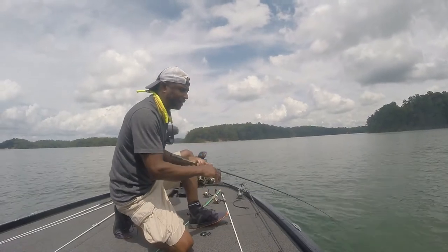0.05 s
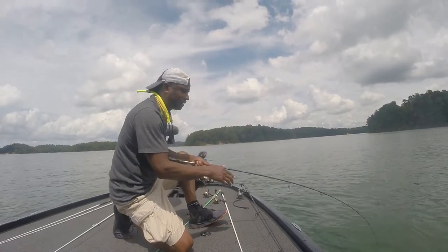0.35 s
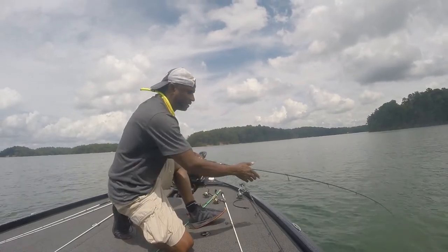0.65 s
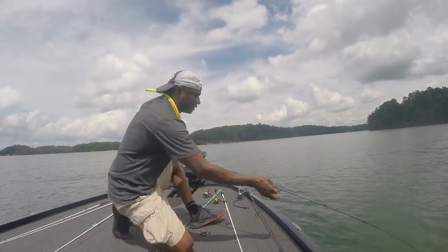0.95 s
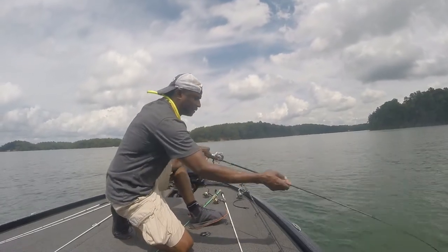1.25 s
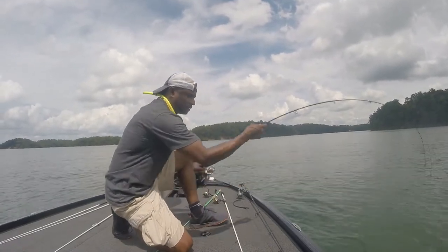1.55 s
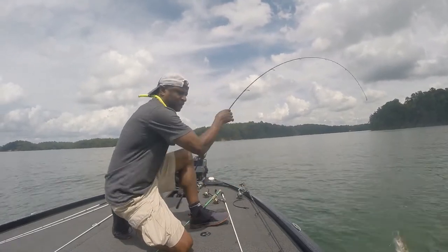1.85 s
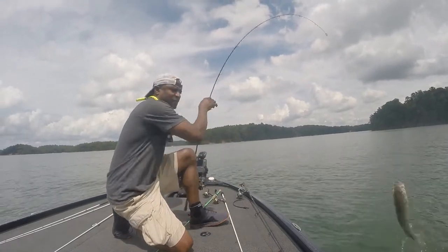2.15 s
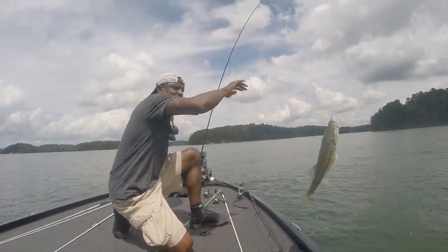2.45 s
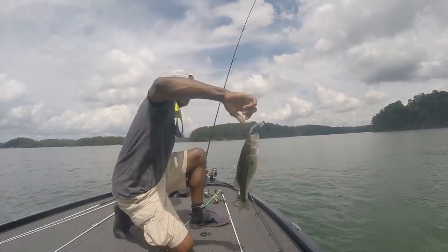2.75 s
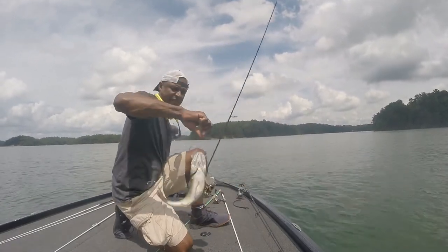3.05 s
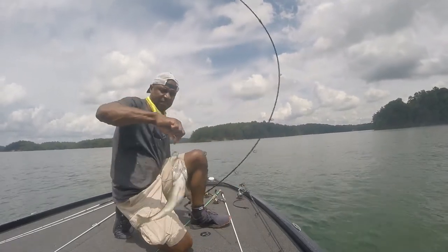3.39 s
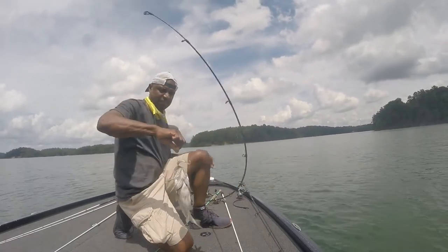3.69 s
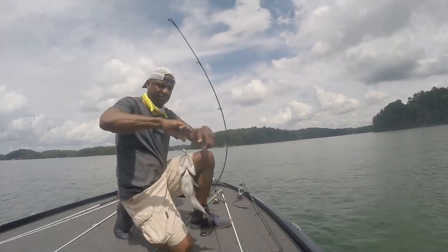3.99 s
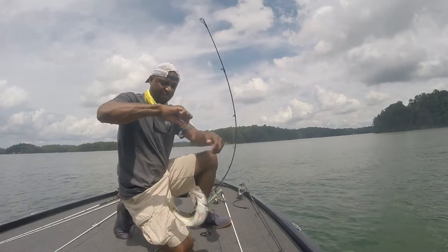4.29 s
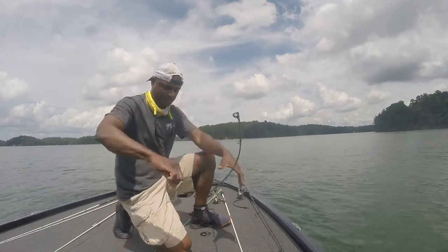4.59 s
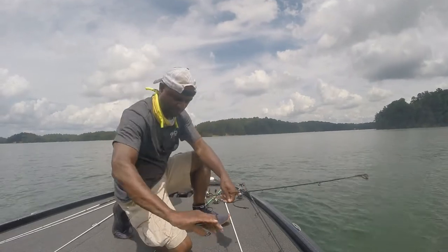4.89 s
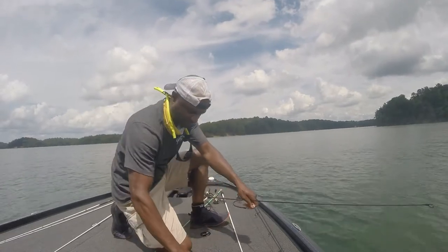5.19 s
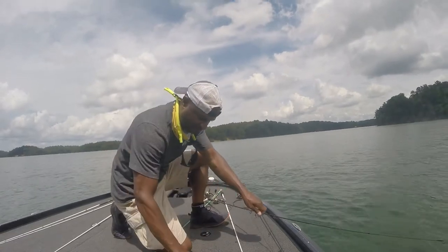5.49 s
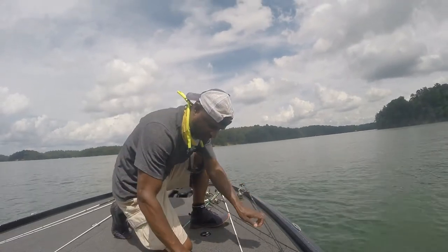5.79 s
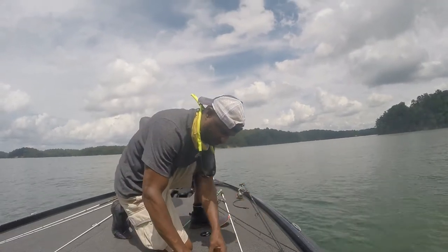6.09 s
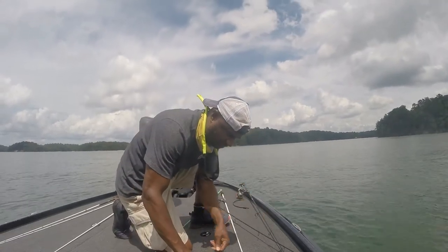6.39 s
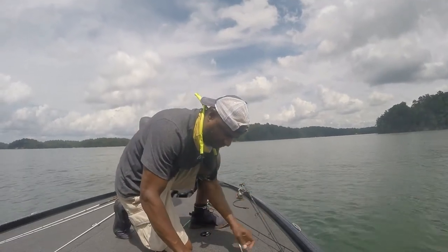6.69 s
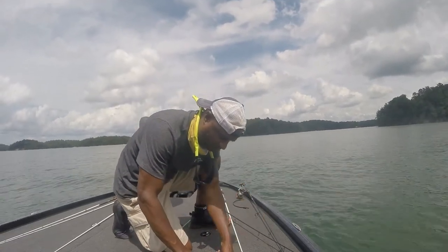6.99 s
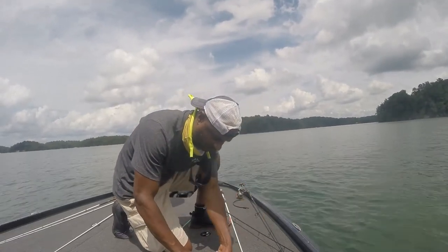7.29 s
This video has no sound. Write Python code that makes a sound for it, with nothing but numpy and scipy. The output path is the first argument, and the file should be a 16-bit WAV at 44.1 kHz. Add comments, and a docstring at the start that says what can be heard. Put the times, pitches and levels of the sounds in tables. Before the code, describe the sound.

A boat motor idles with a steady, throbbing hum and faint hiss, heard from the deck on a calm lake. Water splashes and drips lightly as a fish is lifted out. Line hisses and the lure clicks, then the fish hits the hollow deck with a thump and two quick flaps. The reel whirrs briefly, and the rod is set down with two rattling clacks and a few small ticks.

```python
"""A boat motor idles with a steady throb, heard from the deck on a calm lake: exhaust hum, puffs of gas,
rumble, thin whines, hiss and lapping ripples. A fish is lifted out; water patters and rings as bubbles.
Line hisses through the guides and the lure clicks. The fish drops on the hollow deck with a thump and
two flaps, ringing its modes, and the spool whirrs briefly. The rod is laid down with two rattling
clacks and a few small ticks."""
import sys
import numpy as np
from scipy import signal
from scipy.fft import rfft, irfft, next_fast_len
from scipy.io import wavfile
from scipy.ndimage import uniform_filter1d

SR = 44100
rng = np.random.default_rng(int(sys.argv[2]) if len(sys.argv) > 2 else 0)


def store_pcm(level_fs):
    """Save levels as 16-bit WAV."""
    pcm = np.round(np.clip(level_fs, -1, 1) * 32767).astype(np.int16)
    wavfile.write(sys.argv[1], SR, np.atleast_2d(pcm).T)


N = 324017
TIME_S = np.arange(N) / SR

# Table levels are taken before each source's gains and filters.
# hiss spectrum: f/Hz, density/dB
HISS_SPECTRUM = [(900, -110), (2200, -89.5), (2900, -93.5), (3650, -95.5), (4000, -101), (5300, -97.5),
                 (6200, -93.5), (6850, -89.5), (7200, -86), (7900, -96), (8900, -108), (12500, -116),
                 (15500, -124)]
# faint whines in the hiss: f/Hz, level/dB, width/Hz
WHINE_BANDS = [(719, -61.5, 12), (3680, -68, 130), (4240, -73.5, 51), (5800, -70.5, 48), (6170, -67.5, 37),
               (6320, -70.5, 30), (6800, -64.5, 25), (7210, -66.5, 29), (7600, -72, 17)]
# engine cycle rate: t/s, f/Hz
CYCLE_RATE = [(0.0, 9.61), (1.0, 9.596), (1.8, 9.608), (2.2, 9.695), (2.8, 9.568), (3.4, 9.635),
              (4.3, 9.554), (5.0, 9.707), (5.6, 9.543), (6.2, 9.607), (6.7, 9.511), (7.35, 9.545)]
# exhaust and hull rumble: f/Hz, density/dB
RUMBLE_SPECTRUM = [(10, -82), (28, -69), (55, -58), (95, -62.5), (135, -61), (200, -68.5), (240, -56.5),
                   (280, -67.5), (370, -63), (455, -70), (490, -68), (590, -78.5), (1150, -80),
                   (1700, -89.5)]
# swell of the motor whine: t/s, level/dB
MOTOR_WHINE_SWELL = [(0, -68), (1.0, -58.5), (1.28, -47), (1.58, -63), (1.85, -48.5), (2.2, -56.5),
                     (2.45, -53.5), (3.4, -56.5), (3.7, -62), (5.6, -59), (5.9, -55.5), (6.35, -53),
                     (6.6, -70)]
# exhaust harmonics: order (multiple of the cycle rate), level/dB
EXHAUST_ORDERS = [(5, -39), (6, -50), (8, -47), (13, -39), (15, -40.5), (16, -37), (17, -57.5), (19, -46.5),
                  (21, -58), (24, -46), (25, -47), (26, -51), (32, -49.5), (33, -55.5), (36, -54.5),
                  (37, -50), (38, -52.5), (39, -53.5), (40, -61.5), (41, -52), (44, -57)]
# where each range of orders peaks: lowest order, phase/cycles
ORDER_PEAKS = [(0, .67), (20, .59), (30, .83)]
# puffs of the stronger firings: phase/cycles, f/Hz, width/Hz, level/dB
EXHAUST_PUFFS = [(.07, 364, 149, -42), (.12, 536, 160, -54), (.27, 1090, 328, -50), (.42, 350, 131, -42.5),
                 (.52, 990, 438, -49), (.65, 1100, 330, -51.5), (.86, 489, 180, -42.5)]
# spatter resonances: f/Hz, width/Hz, level/dB
SPATTER_BANDS = [(1540, 240, -4), (2390, 390, 3), (3430, 210, 5), (5430, 2200, -4), (11000, 8000, -13),
                 (14000, 2800, -13)]
# fish thrashing at the surface: t/s, patter/dB, fizz/dB, hold/s
FISH_SPLASHES = [(1.669, -56, -62, 0.012), (1.688, -53, -60, 0.01), (1.74, -61, -55, 0.008),
                 (1.833, -52, -53, 0.009), (2.178, -61, -59, 0.0089), (2.208, -61, -65, .004),
                 (2.439, -62, -55, .01)]
# distinct drops and plops: t/s, level/dB, f/Hz
WATER_DROPS = [(0.129, -42, 2890), (0.133, -41, 1030), (0.589, -44, 2480), (0.608, -46, 2050),
               (1.616, -36, 1040), (1.69, -50, 2880), (1.739, -47, 4500), (1.749, -37, 2400),
               (1.759, -39, 2200), (1.761, -43, 3200), (1.815, -40, 3250), (1.834, -41, 3400),
               (1.842, -36, 1540), (1.844, -38, 5070), (1.861, -34, 710), (1.887, -37.5, 1530),
               (1.904, -43, 3320), (1.931, -33.5, 1140), (2.01, -44, 1840), (2.022, -47, 2700),
               (2.044, -30, 1220), (2.053, -41, 1860), (2.069, -45, 2000), (2.08, -45, 1700),
               (2.125, -42, 2490), (2.136, -43, 3000), (2.184, -43, 2900), (2.285, -42, 3580),
               (2.481, -35, 720), (2.789, -48, 3100), (2.809, -44, 3900), (2.968, -45, 2630),
               (3.428, -37, 2140), (3.493, -33, 2080), (4.391, -29.5, 790), (4.868, -29.5, 1060),
               (6.503, -35, 1080)]
# rubbing resonances: f/Hz, width/Hz, level/dB
RUB_BANDS = [(2000, 1000, -4.5), (3530, 680, -3.5), (5260, 970, -10.5), (6000, 2000, -21.5)]
# grabs at wet fish and line: t/s, level/dB, hold/s
HAND_GRABS = [(0.031, -50, 0.013), (2.772, -54, .012), (3.436, -44.5, 0.0069), (3.486, -54, .008),
              (4.267, -55, 0.0088), (4.381, -51, 0.0064)]
# longer fumbling with fish and tackle: t/s, level/dB, hold/s
HAND_FUMBLES = [(4.14, -66, 0.13), (6.27, -61, 0.26)]
# hiss bands of line in the guides: f/Hz, width/Hz, level/dB
GUIDE_BANDS = [(6130, 530, -1), (6700, 300, 1), (7600, 650, -3)]
# taps of lure and reel: t/s, level/dB
LURE_TAPS = [(3.714, -42), (3.722, -47), (3.92, -47), (4.054, -39), (4.061, -44), (4.191, -44),
             (4.232, -43), (4.277, -42), (4.314, -45), (4.324, -45), (4.431, -43), (4.462, -41),
             (4.519, -37), (6.458, -49), (6.524, -44), (6.603, -45)]
# lure and reel resonances: f/Hz, width/Hz, level/dB
LURE_MODES = [(1700, 110, 1.5), (2240, 180, -3), (3100, 220, 1), (3760, 190, 1), (4520, 660, -9.5)]
# spool resonances: f/Hz, width/Hz, level/dB
SPOOL_MODES = [(2320, 210, 8), (2930, 160, 11.5)]
# rod and tackle knocks: t/s, level/dB, decay/s, cutoff/Hz
TACKLE_KNOCKS = [(2.714, -44, 0.002, 16000), (2.7742, -45.5, 0.0056, 15000), (3.423, -40.5, .003, 12000),
                 (3.436, -43, .009, 10000), (3.917, -47, .002, 15000), (4.156, -54, .003, 15000),
                 (4.1825, -46, .001, 15000), (4.191, -49, 0.007, 15000), (4.222, -52, .005, 14000),
                 (4.267, -50, .006, 14000), (4.278, -47, .002, 14000), (4.347, -50, 0.0022, 14000),
                 (4.3812, -35.5, 0.0017, 12000), (4.4852, -31.5, .0016, 19000), (4.519, -48, .004, 13000),
                 (4.561, -41, .001, 13000), (4.622, -46, .004, 15000), (5.8643, -24.5, 0.0067, 16000),
                 (5.876, -39, .005, 13000), (5.888, -35, .004, 12000), (5.894, -36, 0.0047, 8000),
                 (6.1215, -29.5, 0.007, 16500), (6.132, -40.5, .005, 14000), (6.147, -41, .005, 12000),
                 (6.26, -47, 0.006, 11900), (6.375, -35.5, 0.0056, 10700), (6.399, -42, .004, 11000),
                 (6.455, -42, 0.0054, 9500), (6.521, -38.5, 0.004, 9600), (6.6, -45, .003, 8000),
                 (6.725, -42.5, 0.0062, 10500), (6.76, -48, .005, 10500)]
# rod, guide and reel resonances: f/Hz, width/Hz, level/dB
ROD_MODES = [(690, 200, 6), (1061, 170, 7), (1520, 220, 0), (2020, 350, -2), (2428, 130, 1.5),
             (3300, 280, 4), (3760, 160, 1), (5550, 300, -3), (6180, 140, 5), (6550, 160, 0),
             (7250, 300, -3), (8440, 100, -2), (9620, 150, -9), (11400, 450, -2), (12420, 350, -5.5),
             (13960, 900, -9.5)]
# fish hitting the deck: t/s, push/dB, contact/s, slap/dB, slap tilt/(dB per octave)
FISH_BLOWS = [(4.4834, 7.5, 0.00394, -4.5, 3.5), (4.4978, -10, 0.0038, -31, 0),
              (4.502, -8, 0.00106, -18, -2), (4.513, -7, 0.0055, -29, -2), (4.5248, -4, 0.0093, -27, -5),
              (4.5605, -11, 0.00086, -13.5, -2.5), (4.6174, -6.5, 0.00304, -9, -6.5),
              (4.621, -19, 0.0018, -16.5, 5.5)]
# hollow deck: f/Hz, level/dB, t60/s
DECK_MODES = [(38.9, -21.5, 0.48), (65, -22.5, 0.17), (101, -21, 0.08), (141.4, -13, 0.098),
              (197, -1.5, 0.033), (350, -13, 0.047), (419.3, -11.5, 0.093), (578, -27, 0.11),
              (720, -21, 0.1)]
# deck surface under a wet slap: f/Hz, level/dB, t60/s
SURFACE_MODES = [(860, -10, 0.013), (1060, -12, 0.018), (1220, -14, 0.014), (1820, -21, 0.014),
                 (2570, -36, 0.012), (3320, -18, 0.011), (3710, -22.5, 0.016)]


def from_db(db):
    """Decibels to gain."""
    return 10 ** (np.asarray(db) / 20)


def unit_rms(x):
    """Scale to rms 1."""
    return x / np.sqrt(np.mean(x ** 2) + 1e-20)


def add(out, t_s, sound):
    """Mix a short sound in at t_s."""
    start = round(t_s * SR)
    out[start:start + len(sound)] += sound[:N - start]


def envelope(start_s, hold_s, attack_s, release_s):
    """Linear rise, hold at 1, exponential release."""
    age_s = TIME_S - start_s
    release = np.exp(-np.clip((age_s - attack_s - hold_s) / release_s, 0, 20))
    return np.clip(age_s / attack_s, 0, 1) * release


def bursts(rows, attack_s, release_s):
    """Sum of envelopes, one per row of t/s, level/dB, hold/s."""
    return sum(from_db(db) * envelope(t_s, hold_s, attack_s, release_s) for t_s, db, hold_s in rows)


def drift(rate_hz):
    """Smooth random wander, rms 1."""
    step, settle = 40, 2000
    r = np.exp(-2 * np.pi * rate_hz * step / SR)
    slow = signal.lfilter([1], [1, -2 * r, r * r], rng.standard_normal(N // step + settle + 2))[settle:]
    return np.interp(np.arange(N) / step, np.arange(len(slow)), unit_rms(slow))


def noise(spectrum):
    """Noise shaped by rows of f/Hz, density/dB; falls steeply above the last row."""
    size = next_fast_len(N)
    hz, db = np.transpose(spectrum)
    bins_hz = np.maximum(np.fft.rfftfreq(size, 1 / SR), 1)
    gain = from_db(np.interp(np.log(bins_hz), np.log(hz), db)) / np.maximum(bins_hz / hz[-1], 1) ** 3
    return irfft(rfft(rng.standard_normal(size)) * gain, size)[:N] * np.sqrt(SR / 2)


def grains(per_s, spread_db):
    """Random clicks of uneven size, rms 1."""
    sizes = from_db(spread_db * np.minimum(rng.exponential(1, N), 4)) * rng.choice([-1, 1], N)
    return unit_rms(sizes * (rng.random(N) < per_s / SR))


def low_pass(x, hz, order=4):
    """Treble roll-off."""
    return signal.sosfilt(signal.butter(order, min(hz, .45 * SR), fs=SR, output="sos"), x)


def ring(force, hz, t60_s):
    """One mode: a unit click rings at height 1, a steady push radiates nothing."""
    r = from_db(-60 / (t60_s * SR))
    poles = [1, -2 * r * np.cos(2 * np.pi * hz / SR), r * r]
    return signal.lfilter([.5, 0, -.5], poles, force + 1e-18)


def resonate(x, bands):
    """Parallel resonators (f/Hz, width/Hz, level/dB) with alternating signs."""
    out = 0
    for k, (hz, width_hz, db) in enumerate(bands):
        r = np.exp(-np.pi * width_hz / SR)
        poles = [1, -2 * r * np.cos(2 * np.pi * hz / SR), r * r]
        gain = (-1) ** k * from_db(db) * (1 - r * r) / 2
        out += gain * signal.lfilter([1, 0, -1], poles, x + 1e-18)
    return out


def band_noise(bands):
    """White noise passed twice through the same resonators."""
    return resonate(resonate(rng.standard_normal(N), bands), bands)


def bubble(hz, ring_s, rise_per_s):
    """One bubble: a short dying tone of rising pitch."""
    age_s = np.arange(SR // 40) / SR
    return np.exp(-age_s / ring_s) * np.sin(2 * np.pi * hz * age_s * (1 + rise_per_s * age_s))


def fizz(per_s, low_hz, high_hz, ring_s=0.0068, rise_per_s=2.9, spread_db=3.0):
    """Bubbles of random time, strength and pitch, rms 1."""
    out = np.zeros(N)
    for when, size, pitch in rng.random((int(per_s * N / SR), 3)):
        strength = from_db(-spread_db * np.log(max(size, .03)))
        hz = low_hz * (high_hz / low_hz) ** pitch
        add(out, when * (N - 1) / SR, strength * bubble(hz, ring_s, rise_per_s))
    return unit_rms(out)


def whines(swell_db=1.5):
    """Faint narrow tones, each wavering in level and phase on its own."""
    out = 0
    for hz, db, width_hz in WHINE_BANDS:
        angle = 2 * np.pi * hz * TIME_S
        swell = unit_rms(from_db(swell_db * drift(3)))
        out += from_db(db) * swell * (drift(width_hz) * np.cos(angle) + drift(width_hz) * np.sin(angle))
    return out


def hiss(start_db=-0.5, fade_db_per_s=0.11, waver_db=.5, dip_at_s=6.222, dip_s=.024, dip_db=-12):
    """High hiss and whines waver, sink slowly and dip once for an instant."""
    in_dip = (TIME_S > dip_at_s) & (TIME_S < dip_at_s + dip_s)
    dip = uniform_filter1d(from_db(dip_db * in_dip), size=180)
    level_db = start_db - fade_db_per_s * TIME_S + waver_db * (drift(5.5) + drift(16))
    return (noise(HISS_SPECTRUM) + whines()) * from_db(level_db) * dip


def lapping(level_db=-57.5):
    """Ripples plip against the hull at much the same pitch."""
    return from_db(level_db) * fizz(per_s=30, low_hz=950, high_hz=1230)


def motor_whine(cycle, order=64, waver=0.57):
    """Thin unsteady tone locked to engine speed; swells and fades."""
    angle = 2 * np.pi * order * cycle
    tone = (1 + waver * drift(11.6)) * np.cos(angle) + waver * drift(10) * np.sin(angle)
    level_db = np.interp(TIME_S, *np.transpose(MOTOR_WHINE_SWELL))
    return from_db(level_db) * unit_rms(tone)


def rumble(cycle, firings_per_cycle=8, firing_db=0.2, waver_db=1.0):
    """Gas noise swells slightly with each firing."""
    swell_db = firing_db * np.cos(2 * np.pi * firings_per_cycle * cycle)
    return noise(RUMBLE_SPECTRUM) * from_db(swell_db + waver_db * drift(33))


def exhaust_hum(cycle, base_waver=0.13, waver_per_order=0.0064, flutter_hz=5.9):
    """Engine harmonics add up to one uneven throb per cycle; high orders waver more."""
    out = 0
    for order, db in EXHAUST_ORDERS:
        waver = base_waver + waver_per_order * order
        peak_phase = [phase for lowest, phase in ORDER_PEAKS if order >= lowest][-1]
        angle = 2 * np.pi * order * (cycle - peak_phase)
        wave = (1 + waver * drift(flutter_hz)) * np.cos(angle)
        wave += waver * drift(flutter_hz) * np.sin(angle)
        out += from_db(db) * wave * np.sqrt(2 / (1 + 2 * waver ** 2))
    return out


def chug(cycle, puff_cycles=0.051):
    """Strong firings puff gas through the exhaust resonances, in the same pattern every cycle."""
    out = 0
    for phase, hz, width_hz, db in EXHAUST_PUFFS:
        offset_cycles = (cycle - phase + .5) % 1 - .5
        gate = np.exp(-(offset_cycles / puff_cycles) ** 2)
        out += from_db(db) * gate * unit_rms(band_noise([(hz, width_hz, 0)]))
    return out


def water(trickle_db=-62, spray_db=-11, ring_at_1khz_s=0.0038):
    """Splashes and run-off from the fish patter and fizz; larger, lower drops ring longer."""
    spray = fizz(per_s=600, low_hz=8000, high_hz=14000, ring_s=.0003)
    spatter = resonate(grains(per_s=900, spread_db=2.5), SPATTER_BANDS)
    patter = unit_rms(spatter) + from_db(spray_db) * spray
    bubbles = fizz(per_s=200, low_hz=1300, high_hz=5200, ring_s=.002, spread_db=3.5)
    trickle = envelope(start_s=1.56, hold_s=0.19, attack_s=0.26, release_s=.2)
    out = from_db(trickle_db) * trickle * (patter + bubbles)
    for t_s, patter_db, fizz_db, hold_s in FISH_SPLASHES:
        splash = envelope(t_s, hold_s, attack_s=0.003, release_s=0.0053)
        out += splash * (from_db(patter_db) * patter + from_db(fizz_db) * bubbles)
    for t_s, db, hz in WATER_DROPS:
        ring_s = ring_at_1khz_s * np.sqrt(1000 / hz)
        add(out, t_s, from_db(db) * bubble(hz, ring_s, rise_per_s=3.1))
    return out


def handling(clump_db=4.0, cutoff_hz=7000):
    """Small slips come in clumps as fish and tackle are grabbed and fumbled."""
    slips = grains(per_s=3700, spread_db=7.0)
    clumps = unit_rms(from_db(clump_db * drift(51)))
    fumbles = bursts(HAND_FUMBLES, attack_s=0.055, release_s=0.11) * clumps
    grabs = bursts(HAND_GRABS, attack_s=0.0012, release_s=0.015)
    rub = low_pass(resonate(slips, RUB_BANDS), cutoff_hz)
    return (grabs + fumbles) * unit_rms(rub)


def line_slide(level_db=-56.5, rasp_db=3.0):
    """Taut line drawn through the guides hisses in a few high bands."""
    pull = envelope(start_s=3.64, hold_s=0.29, attack_s=0.29, release_s=0.098)
    rub = band_noise(GUIDE_BANDS) * from_db(rasp_db * drift(25))
    return from_db(level_db) * pull * unit_rms(rub)


def lure_clicks(gain_db=24.5, scuff_db=-17, scuff_s=0.0037):
    """The wriggling fish clicks lure and reel: each a tap with a very short scuff."""
    force = np.zeros(N)
    age_s = np.arange(SR // 40) / SR
    for t_s, db in LURE_TAPS:
        scuff = from_db(scuff_db) * rng.standard_normal(len(age_s)) * np.exp(-age_s / scuff_s)
        add(force, t_s, from_db(db + gain_db) * ((age_s == 0) + scuff))
    return resonate(force, LURE_MODES)


def reel(level_db=-51.5):
    """The fish pulls line off the spool, which whirrs in two narrow resonances and coasts down."""
    spin = envelope(start_s=4.657, hold_s=0.067, attack_s=0.067, release_s=0.11)
    return from_db(level_db) * spin * unit_rms(band_noise(SPOOL_MODES))


def tackle(gain_db=2.0, crack_db=12, tail_db=-12, tail_stretch=2.9, uneven_db=1.0, direct_db=-12.0):
    """Each knock is a hard crack and a dying, gritty chatter; both ring the rod."""
    force = np.zeros(N)
    age_s = np.arange(SR // 6) / SR
    contacts = grains(per_s=12000, spread_db=2.0) * from_db(uneven_db * drift(160))
    for t_s, db, decay_s, cutoff_hz in TACKLE_KNOCKS:
        start = round(t_s * SR)
        decay = np.exp(-age_s / decay_s) + from_db(tail_db) * np.exp(-age_s / (tail_stretch * decay_s))
        chatter = decay * contacts[start:start + len(age_s)]
        chatter *= np.linalg.norm(decay) / np.linalg.norm(chatter)  # same energy however contacts fall
        knock = from_db(crack_db) * (age_s == 0) + chatter
        add(force, t_s, from_db(db) * low_pass(knock, cutoff_hz, order=2))
    return from_db(gain_db) * (resonate(force, ROD_MODES) + from_db(direct_db) * force)


def fish_landing(squelch_db=-0.5, squelch_s=0.0024, judder_db=-42, judder_s=0.016,
                 pivot_hz=1500, cutoff_hz=3800):
    """The soft body pushes the deck, wet skin slaps its surface, the boards judder briefly."""
    push, slaps = np.zeros(N), np.zeros((len(SURFACE_MODES), N))
    age_s = np.arange(SR // 4) / SR
    for t_s, push_db, contact_s, slap_db, tilt_db_per_octave in FISH_BLOWS:
        pulse = np.hanning(max(int(contact_s * SR), 4))
        add(push, t_s, from_db(push_db) * pulse / pulse.sum())
        squelch = rng.standard_normal(len(age_s)) * np.exp(-age_s / squelch_s)  # skin flattens
        smack = (age_s == 0) + from_db(squelch_db) * squelch / np.linalg.norm(squelch)
        for slap, (hz, _, _) in zip(slaps, SURFACE_MODES):
            tilt_db = tilt_db_per_octave * np.log2(hz / pivot_hz)  # fish body dull, tail bright
            add(slap, t_s + contact_s / 2, from_db(slap_db + tilt_db) * smack)
        judder = rng.standard_normal(len(age_s)) * np.exp(-age_s / judder_s)
        add(push, t_s + contact_s, from_db(slap_db + judder_db) * judder)
    deck = sum(from_db(db) * ring(push, hz, t60_s) for hz, db, t60_s in DECK_MODES)
    surface = sum((-1) ** k * from_db(db) * ring(slaps[k], hz, t60_s)
                  for k, (hz, db, t60_s) in enumerate(SURFACE_MODES))
    return low_pass(deck + surface, cutoff_hz)


def scene():
    """Motor, water, fish and rod in open air; mono."""
    cycle_hz = np.interp(TIME_S, *np.transpose(CYCLE_RATE))
    cycle = np.cumsum(cycle_hz) / SR
    motor = exhaust_hum(cycle) + chug(cycle) + rumble(cycle) + motor_whine(cycle)
    background = motor + hiss() + lapping()
    catch = water() + handling() + line_slide() + lure_clicks() + fish_landing() + tackle() + reel()
    return (background + catch)[None]


def record(dry):
    """Soft clip at full scale, then a steep treble cut."""
    cutoff_hz = 15400
    rounded = dry / (1 + dry ** 8) ** (1 / 8)
    return signal.sosfilt(signal.ellip(10, .1, 80, cutoff_hz, fs=SR, output="sos"), rounded)


dry = scene()
out = record(dry)
store_pcm(out)
```